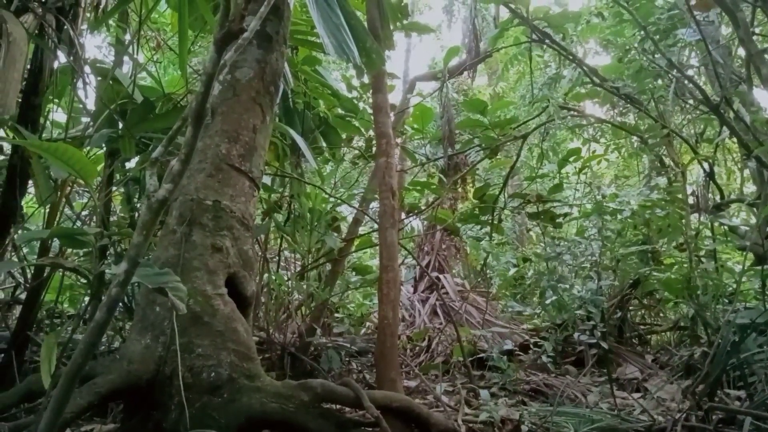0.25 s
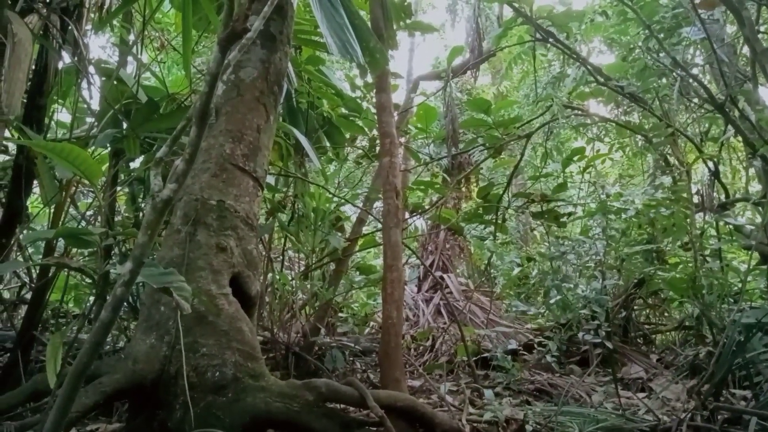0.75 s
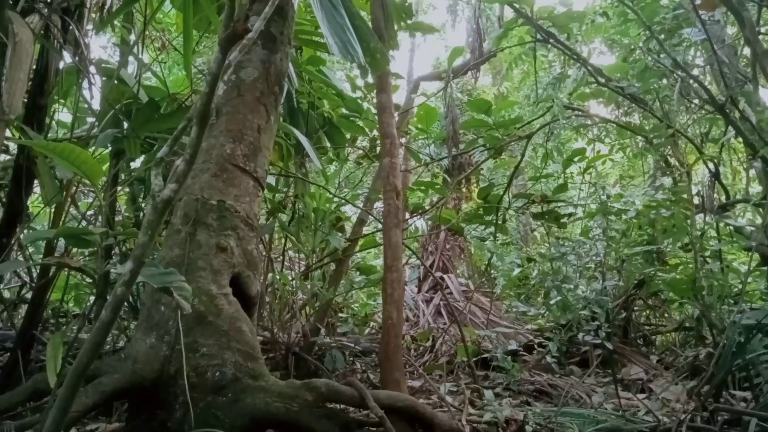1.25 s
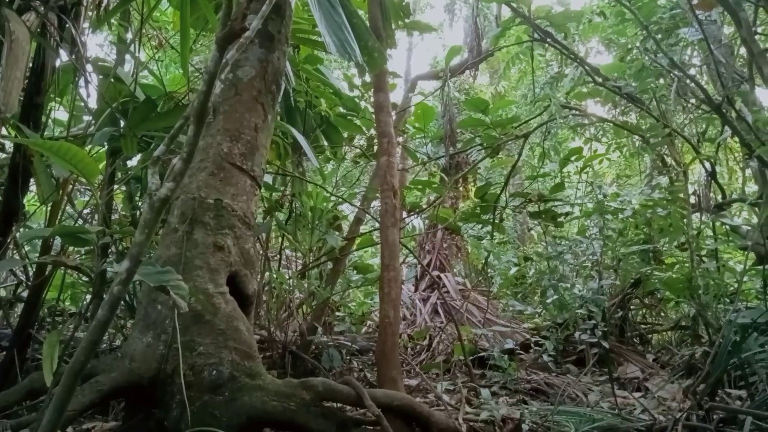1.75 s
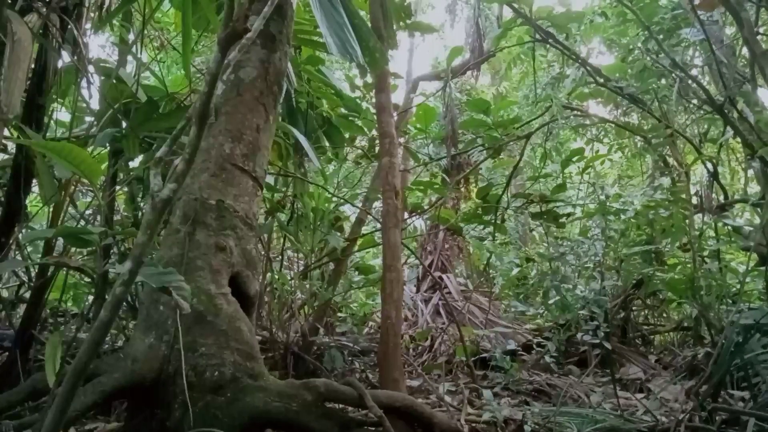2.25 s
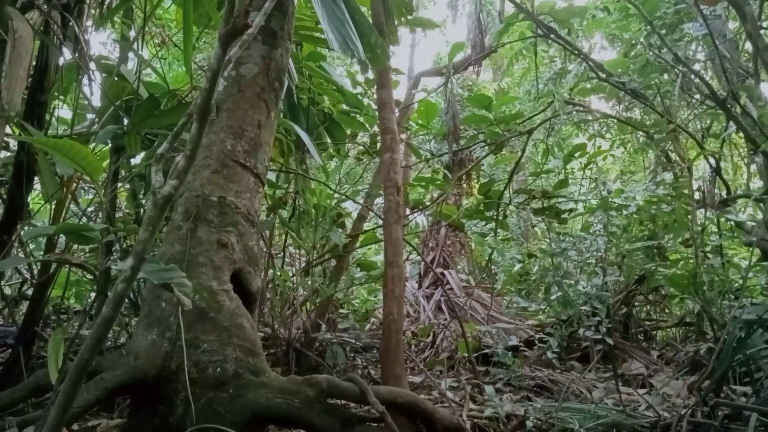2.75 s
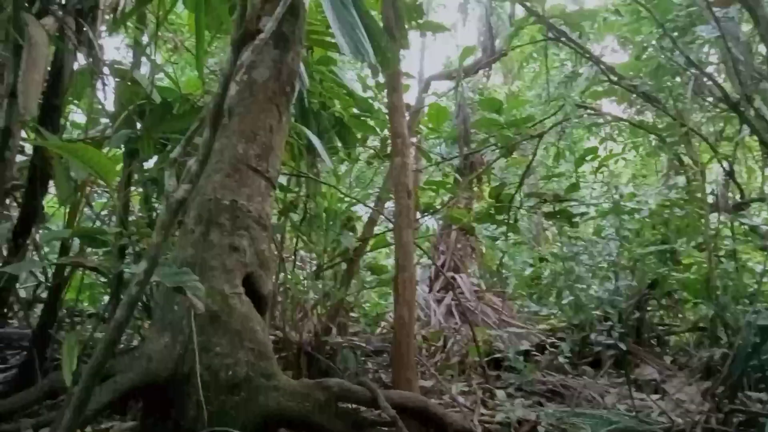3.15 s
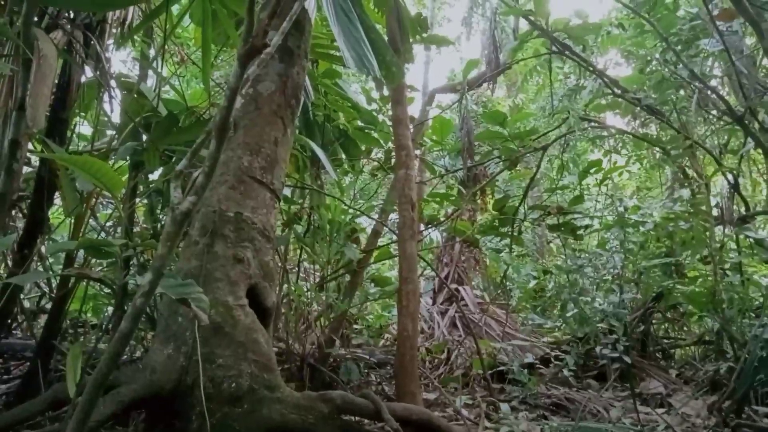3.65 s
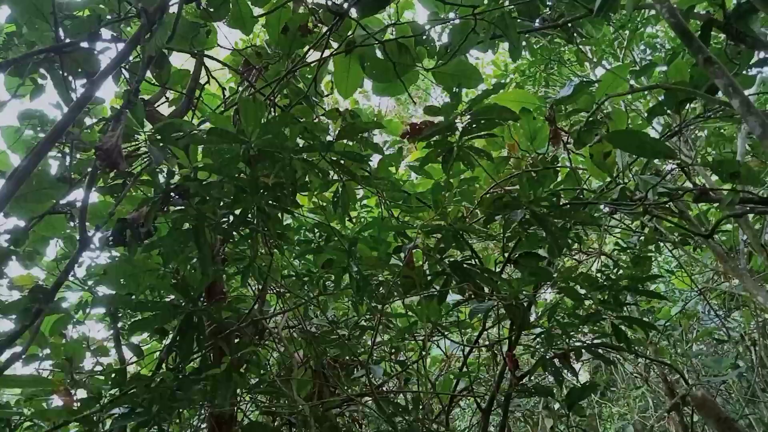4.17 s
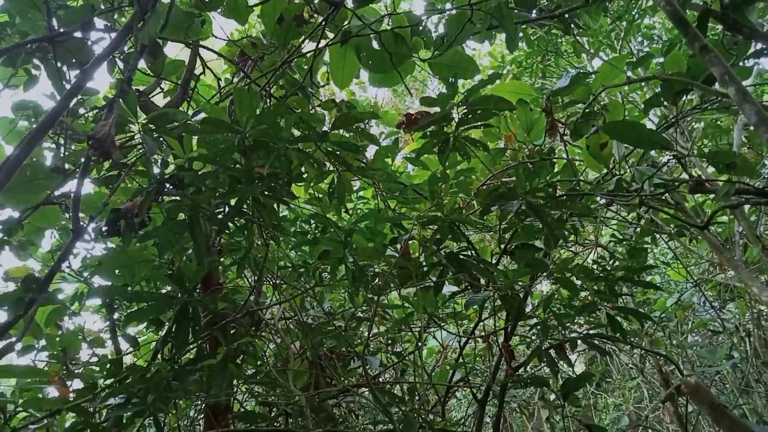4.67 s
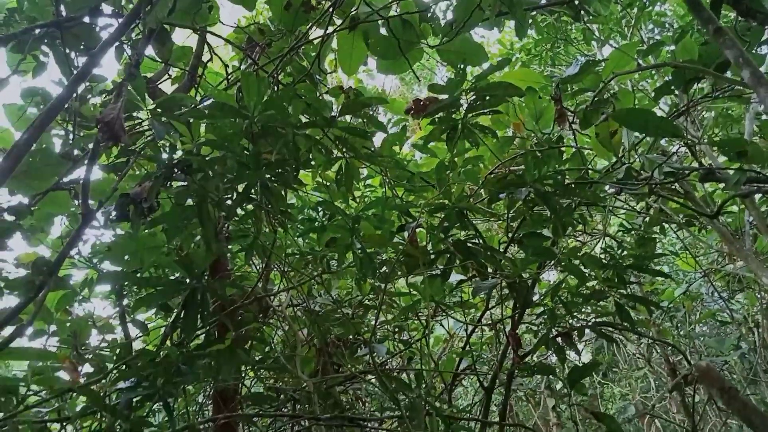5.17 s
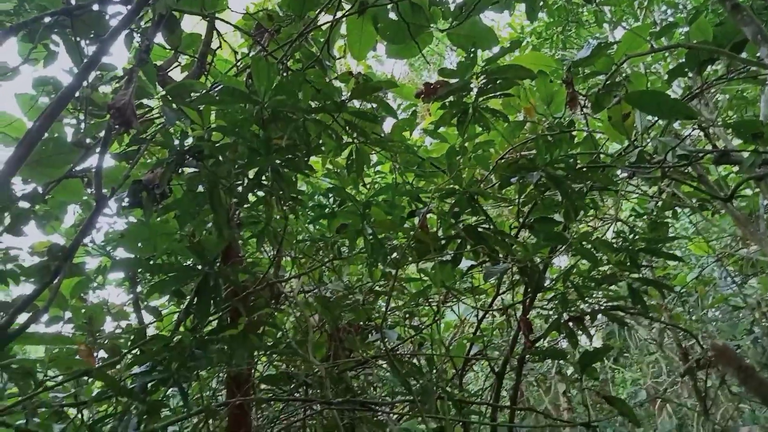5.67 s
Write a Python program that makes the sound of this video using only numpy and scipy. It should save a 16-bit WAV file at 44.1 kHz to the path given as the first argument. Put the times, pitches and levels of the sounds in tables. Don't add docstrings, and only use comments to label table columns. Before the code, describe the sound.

High steady cicada drone in dense forest; a near bird chips, warbles and trills, a sharp click, then hoarse croaks after a brief dip.

```python
import sys
import numpy as np
from scipy import signal
from scipy.fft import rfft, irfft, next_fast_len
from scipy.io import wavfile
from scipy.ndimage import uniform_filter1d

SR = 44100
rng = np.random.default_rng(int(sys.argv[2]) if len(sys.argv) > 2 else 0)


def transcribe(u):
    v = np.clip(np.atleast_2d(u).T, -1, 1)
    q = np.round(v * 32767).astype(np.int16)
    wavfile.write(sys.argv[1], SR, q)


def ratio_of_db(decibels):
    return 10 ** (np.asarray(decibels, float) / 20)


N = 261059
T = np.arange(N) / SR
FIRST_SHOT_END_S, SECOND_SHOT_START_S = 3.886, 4.085
IN_FIRST_SHOT = T < FIRST_SHOT_END_S


def evened(x):
    return x / np.sqrt(np.mean(x ** 2) + 1e-20)


def read(points, hz):
    f, value = np.transpose(points)
    return np.interp(np.log(hz + 1), np.log(f + 1), value)


def add(mix, s, sound):
    part = mix[round(s * SR):][:len(sound)]
    part += sound[:len(part)]


def colour(x, points):
    size = next_fast_len(N)
    hz = np.fft.rfftfreq(size, 1 / SR)
    inside = (hz > points[0][0]) & (hz < points[-1][0])
    spectrum = rfft(x, size) * ratio_of_db(read(points, hz)) * inside
    return evened(irfft(spectrum, size)[..., :N])


def resonate(x, hz, width_hz):
    turn = np.exp(2j * np.pi * np.cumsum(hz * np.ones(len(x))) / SR)
    r = np.exp(-np.pi * width_hz / SR)
    smooth = signal.lfilter([(1 - r) ** 2], [1, -2 * r, r ** 2], x / turn)
    return 2 * (turn * smooth).real


def wander(per_s):
    knots = rng.standard_normal(2000)
    return evened(np.interp(T * per_s, np.arange(2000), knots))


def clicks(per_s):
    turns = np.cumsum(per_s) / SR + rng.random()
    return np.diff(np.floor(turns), prepend=0.).clip(0, 1)


# (frequency [Hz], t60 [s])
FOREST_T60 = [(500, 0.59), (2000, 0.79), (4000, 0.83), (8000, 0.47), (15000, 0.35)]


def forest(x, wide, early_db=0):
    hz, t, z = signal.stft(rng.standard_normal((2, SR)), SR, nperseg=128)
    late = ratio_of_db(-60 * t / read(FOREST_T60, hz)[:, None])
    early = ratio_of_db(early_db + 12.0 - 60 * t / 0.067)
    mid, side = signal.istft(z * (late + early), SR, nperseg=128)[1]
    tails = np.array([mid + wide * side, mid - wide * side]) / np.linalg.norm(mid)
    return signal.fftconvolve(x[None], tails, axes=1)[:, :N]


def sing(hz, gain, shake=0, shake_hz=180, upper_db=-34, rough=0.08, uneven=0.099):
    jitter, flutter = uniform_filter1d(rng.standard_normal((2, len(hz))), size=200) * np.sqrt(200)
    swing = np.sin(2 * np.pi * np.cumsum(shake_hz * (1 + uneven * jitter)) / SR)
    turn = 2 * np.pi * np.cumsum(hz + shake * swing * (1 + .1 * flutter)) / SR
    gain = gain * (1 + rough * flutter)
    upper = ratio_of_db(upper_db) * (ratio_of_db(1.5) * np.sin(2 * turn) + np.sin(3 * turn))
    return np.sqrt(2) * gain * (np.sin(turn) + upper)


def notes(rows, edge, **voice):
    out = np.zeros(N)
    for s, length_s, a_hz, b_hz, c_hz, db in rows:
        u = np.linspace(-1, 1, round(length_s * SR))
        hz = b_hz + (c_hz - a_hz) / 2 * u + ((a_hz + c_hz) / 2 - b_hz) * u ** 2
        gain = ratio_of_db(db) * signal.windows.tukey(len(u), np.clip(edge, 0, 1))
        add(out, s, sing(hz, gain, **voice))
    return out


def follow(rows, **voice):
    s, *columns = np.transpose(rows)
    t = np.arange(s[0], s[-1], 1 / SR)
    hz, db, *shake = (np.interp(t, s, c) for c in columns)
    return s[0], sing(hz, ratio_of_db(db) * signal.windows.tukey(len(t), .08), *shake, **voice)


# (delay [s], length [s], start [Hz], middle [Hz], end [Hz]);
OPENING_SHAPE = [
    (0, .019, 3980, 4150, 5100),
    (.027, .017, 3700, 3600, 2860),
    (.06, .025, 0.363, 4420),
]
# (time [s], first [dB], second [dB], third [dB], third start [Hz])
OPENINGS = [(1.768, -62, -55.5, -51.5, 5430), (1.928, -56, -56, -49, 6100), (2.092, -59, -47, -45, 5980),
            (2.234, -46.5, -43, -41.5, 5970), (2.376, -43.5, -40, -40, 5130)]


def opening_chips():
    up, down, (late_s, length_s, share, end_hz) = OPENING_SHAPE
    rows = []
    for s, up_db, down_db, high_db, hz in OPENINGS:
        middle_hz = end_hz + share * (hz - end_hz)
        rows.append((s + up[0], *up[1:], up_db))
        rows.append((s + down[0], *down[1:], down_db))
        rows.append((s + late_s, length_s, hz, middle_hz, end_hz, high_db))
    return rows


# (delay [s], length [s], start [Hz], middle [Hz], end [Hz], level [dB])
MOTIF_SHAPE = [
    (0, .022, 4120, 3980, 2980, -0.5),
    (.021, 0.012, 3470, 4030, 4330, 1),
    (.041, .023, 3130, 3430, 4090, -1),
]
# (time [s], level [dB], warble length [s], lift of the rise [ratio], warble end [Hz])
MOTIFS = [(2.517, -41, 0.05, 1.01, 2920), (2.679, -37.5, .042, .99, 2760), (2.834, -38, 0.061, 0.93, 2990),
          (3.0, -36, .052, 1.06, 2935), (3.164, -36, .064, 1.026, 2580)]


def motif_chips():
    rows = []
    for s, db, _, lift, _ in MOTIFS:
        for k, (delay_s, length_s, a_hz, b_hz, c_hz, note_db) in enumerate(MOTIF_SHAPE):
            middle_hz = b_hz * lift ** (k == 1)
            end_hz = c_hz * lift ** (k > 0)
            rows.append((s + delay_s, length_s, a_hz, middle_hz, end_hz, db + note_db))
    return rows


def warbles():
    rows = [(s + .058, length_s, 3416, 3020, end_hz, db - 4.5) for s, db, length_s, _, end_hz in MOTIFS]
    return notes(rows, 0.19, shake=316, shake_hz=213.0, rough=0.17)


# (time [s], level [dB])
SQUEAKS = [(3.39, -52.5), (3.489, -53.5)]
# (delay [s], length [s], start [Hz], middle [Hz], end [Hz], level [dB])
SQUEAK_SHAPE = [(0, 0.0088, 3680, 5160, 6500, -2), (.008, .02, 3260, 3750, 3600, 1),
                (0.019, .024, 6300, 6100, 4350, 0.5)]


def squeaks():
    rows = [(s + delay_s, length_s, a_hz, b_hz, c_hz, db + note_db)
            for s, db in SQUEAKS
            for delay_s, length_s, a_hz, b_hz, c_hz, note_db in SQUEAK_SHAPE]
    return notes(rows, 0.45, shake=280, shake_hz=189, rough=0.22, upper_db=-17)


# (time [s], centre [Hz], level [dB])
TRILL = [(3.568, 3450, -34.5), (3.59, 3000, -45.5), (3.615, 2430, -50.5), (3.645, 2870, -49),
         (3.67, 3640, -36), (3.71, 4050, -40.5), (3.8, 4380, -43), (3.883, 4324, -46.5), (3.895, 4200, -62)]


def trill():
    first_hz, last_hz, growth_s = 200, 676, 0.2
    s = np.array(TRILL)[:, 0]
    grown = 1 - np.exp(-(s - s[0]) / growth_s)
    rows = np.column_stack([TRILL, first_hz + (last_hz - first_hz) * grown])
    return follow(rows, rough=0.23, uneven=0.2, upper_db=-32)


def near_bird():
    song = notes(opening_chips() + motif_chips(), 0.51, rough=0.32)
    song += squeaks() + warbles()
    last_note = (3.275, .036, 2620, 2430, 2250, -43)
    song += notes([last_note], 0.54, shake=130, shake_hz=200, rough=0.38)
    add(song, *trill())
    return ratio_of_db(np.array([[-4.2], [-3.1]])) * song + ratio_of_db(-4) * forest(song, 0.35, early_db=7.5)


# (time [s], hold [s], effort [dB], change over hold [dB], throat centre [Hz])
CROAKS = [
    (4.157, 0.074, -54.5, -1, 2026),
    (4.554, 0.16, -40.5, -4, 2170),
    (4.79, .02, -64, -8, 2030),
    (4.878, 0.17, -53.5, -2, 1950),
    (5.013, .15, -41, -2, 2150),
    (5.479, 0.09, -40, -6.5, 2130),
    (5.56, 0.23, -50.5, -7, 2133),
    (5.83, 0.17, -42, -8, 2123),
]
# (share of centre [ratio], width [Hz], level [dB])
THROAT_MODES = [(.86, 228, -4.5), (0.983, 200, 10.5), (1.08, 157.4, 4), (1.21, 300, -9), (1.34, 300, -10),
                (1.58, 250, -21), (.5, 185.2, -15.5)]


def croaker():
    rise_db_per_s, fall_db_per_s = 900, 500
    sag, shut, open_s = -0.056, -0.076, 0.012
    s, hold_s, effort_db, change_db, hz = np.transpose(CROAKS)[:, :, None]
    u = np.clip((T - s) / hold_s, 0, 1)
    db = effort_db + change_db * u
    db = db - rise_db_per_s * (s - T).clip(0) - fall_db_per_s * (T - s - hold_s).clip(0)
    centres_hz = hz * (1 + sag * (u - .5) + shut * np.exp(-u * hold_s / open_s))
    centre_hz = np.take_along_axis(centres_hz, db.argmax(0)[None], 0)[0]
    centre_hz = uniform_filter1d(centre_hz, size=500)
    pulses = clicks(200 * (1 + .035 * wander(40))) * ratio_of_db(1.76 * wander(60))
    drive = evened(pulses) + 0.99 * rng.standard_normal(N)
    modes = [ratio_of_db(g) * resonate(drive, k * centre_hz, width_hz) for k, width_hz, g in THROAT_MODES]
    throat = sum(modes[::2]) - sum(modes[1::2])
    envelope = np.sqrt(uniform_filter1d(throat ** 2, size=2000) + 1e-20)
    voice = throat / envelope * ratio_of_db(db.max(0))
    return ratio_of_db(np.array([[-2.2], [-3.1]])) * voice + ratio_of_db(-5.5) * forest(voice, 0.067, early_db=3.0)


# (time [s], pitch [Hz], level [dB])
WHISTLES = [
    [(1.28, 1801, -64), (1.332, 1698, -62), (1.352, 1904, -58.5), (1.466, 2024, -56), (1.544, 2059, -53), (1.59, 2094, -62), (1.65, 2040, -64), (1.668, 2226, -57), (1.685, 2151, -51)],
    [(2.02, 3020, -59), (2.045, 2950, -48), (2.168, 2869, -54), (2.254, 2540, -47.5), (2.306, 2443, -54), (2.36, 2400, -74)],
    [(3.98, 6050, -79), (4.006, 6083, -74), (4.08, 6050, -92)],
    [(5.38, 1930, -73), (5.41, 1887, -55.5), (5.47, 1842, -49.5)],
    [(5.335, 2475, -78), (5.372, 2646, -60), (5.428, 2820, -69), (5.49, 2930, -67)],
    [(5.5, 3440, -72), (5.54, 3370, -64), (5.736, 3307, -63), (5.77, 3180, -80)],
]
# (time [s], length [s], start [Hz], end [Hz], level [dB])
FLUTTERS = [(1.679, .095, 1905, 1740, -57.5), (2.199, .1, 2550, 2460, -56), (.7, 0.114, 4400, 4450, -76),
            (5.66, .06, 2300, 1450, -55)]
# (time [s], length [s], start [Hz], end [Hz], level [dB])
SLIDES = [(1.222, 0.0777, 1960, 1760, -62.5), (2.13, 0.036, 6300, 5700, -71), (.635, .07, 4720, 4250, -75),
          (5.29, 0.05, 2950, 3640, -69), (5.385, .027, 6400, 6000, -65), (5.405, 0.025, 6150, 3780, -63.5),
          (5.703, 0.045, 6320, 5740, -58), (5.737, 0.015, 5750, 4080, -56.5),
          (5.753, .034, 4210, 3670, -60), (5.825, 0.018, 4800, 4500, -64), (5.87, .05, 3950, 3900, -72)]


def far_birds():
    slides, flutters = ([(s, length_s, a_hz, (a_hz + c_hz) / 2, c_hz, db)
                         for s, length_s, a_hz, c_hz, db in rows] for rows in (SLIDES, FLUTTERS))
    song = notes(slides, 0.14, upper_db=-60)
    song += notes(flutters, 0.22, shake=214, shake_hz=47.7, upper_db=-60)
    peeps = [(.755 + k * .0757, .024, 5600, 5150, 4800, -69.5) for k in range(12)]
    song += notes(peeps, 0.68, rough=0.51, upper_db=-63)
    for rows in WHISTLES:
        add(song, *follow(rows, upper_db=-60, rough=.12))
    return ratio_of_db(np.array([[-1.2], [-2.2]])) * song + ratio_of_db(-5.5) * forest(song, 0.82, early_db=-9.5)


# (time [s], peak [dB], top [Hz], low cut [Hz], sway [dB])
KNOCKS = [
    (3.7497, -10, 1550, 92, -10.5),
    (3.8774, -33.5, 1140, 92.59, -1),
    (4.702, -36.5, 2320, 570, -20),
]


def mic_knocks():
    out, t = np.zeros(N), T[:4000]
    for s, db, top_hz, cut_hz, sway_db in KNOCKS:
        blow = np.exp(-t / 0.00039) + 0.13 * np.exp(-((t - .0011) / 0.00016) ** 2)
        push = signal.sosfilt(signal.butter(5, top_hz * 1.37, fs=SR, output="sos"), blow)
        ring = signal.sosfilt(signal.butter(4, cut_hz, "high", fs=SR, output="sos"), push)
        sway = np.sin(2 * np.pi * (90 * t + 0.21 * (1 - np.exp(-t / 0.0035))))
        sway *= 1 - np.exp(-t / 0.0022)
        add(out, s, ratio_of_db(db) * (ring / ring.max() - ratio_of_db(sway_db - 60 * t / 0.059) * sway))
    return out


# (time [s], peak [dB], pitch [Hz], t60 [s])
TICKS = [(0.076, -40.5, 3250, 0.0094), (.077, -38.5, 2040, 0.0093), (.077, -42, 650, 0.012),
         (0.468, -42, 2850, 0.0063), (.469, -48, 11800, 0.0037), (.469, -60, 5000, .006),
         (0.528, -38, 2780, 0.0065), (.529, -49, 11900, .004), (.529, -58, 5000, .006),
         (.65, -49.5, 1490, .015), (4.794, -40, 1720, 0.028)]


def ticks():
    out, t = np.zeros(N), T[:4000]
    for s, db, hz, t60_s in TICKS:
        add(out, s, ratio_of_db(db - 60 * t / t60_s) * np.sin(2 * np.pi * hz * t))
    return out


# (time [s], level [dB], half length [s], centre [Hz], width [Hz])
RASPS = [
    (5.40, -61.5, 0.085, 13900, 1400),
    (4.30, -72, .03, 13700, 1500),
]


def katydids():
    out = np.zeros(N)
    for s, db, half_s, hz, width_hz in RASPS:
        buzz = evened(resonate(rng.standard_normal(N), hz, width_hz))
        out += ratio_of_db(db) * buzz * np.exp(-abs(T - s) / half_s)
    return out


def chorus(rates_hz, points, crowd, throb_db, throb_hz):
    near = sum(clicks(r * (1 + .006 * wander(7))) * ratio_of_db(1.76 * wander(3.94)) for r in rates_hz)
    drive = evened(forest(near - near.mean(), 0)[0]) + crowd * rng.standard_normal(N)
    beat = np.sin(2 * np.pi * np.cumsum(throb_hz * (1 + 0.0329 * wander(3.8))) / SR)
    return colour(drive, points) * ratio_of_db(throb_db * beat + 0.21 * wander(14))


# (frequency [Hz], level [dB])
LOW_CICADA = [(6000, -41), (6300, -34), (6600, -21.5), (6870, -9.5), (7150, -4), (7350, -2), (7680, -3.5),
              (7850, -10.5), (8050, -23.5), (8300, -13)]
HIGH_CICADA = [(8200, -14), (8450, -2.5), (8650, 3), (8820, 10), (9000, 1.5), (9150, -11), (9380, -17.5),
               (10300, -25), (10900, -25), (13000, -46)]
OVERTONE = [(12300, -26), (13000, -15), (13600, -12), (14400, 2), (15000, -4), (15400, -3), (15540, -9)]
SOLO_CICADA = [(9020, -16), (9110, -3), (9170, 0), (9230, -4), (9310, -18)]
# (start [s], end [s])
BOUTS = [(.07, 0.33), (.33, 1.33), (2.12, 2.8), (2.99, 3.36), (3.72, 3.886), (4.16, 5.92)]


def cicadas(low, high):
    drone = evened(chorus((160, 236, 347), LOW_CICADA, 1.0, 0.19, 47))
    overtone_gain = ratio_of_db(np.where(IN_FIRST_SHOT, -25, -18.5))
    drone = drone + overtone_gain * chorus((320, 410), OVERTONE, 3.6, .6, 17)
    treble = evened(chorus((174, 250), HIGH_CICADA, 1.0, 1.0, 52.5))
    bouts = uniform_filter1d(sum(1. * (T > a) * (T < b) for a, b in BOUTS), size=1200)
    treble = treble + ratio_of_db(-5.5) * bouts * chorus((210,), SOLO_CICADA, 0.95, .8, 50)
    return low * drone + high * treble


# (frequency [Hz], side over mid [dB])
WIDTH = [(60, -6), (110, -17.5), (200, -8.5), (380, -9.5), (700, -16.5), (1290, -9), (2380, -17),
         (4400, -7.5), (8120, -20), (15000, -27)]


def air(points, patchy_db):
    frames, hz = N // 256 + 5, np.fft.rfftfreq(1024, 1 / SR)
    a, b, c, d, patches = rng.standard_normal((frames, 513, 5)).T
    patches = evened(uniform_filter1d(uniform_filter1d(patches, 10, 0), 12, 1))
    mid = a + 1j * b
    side = (c + 1j * d) * ratio_of_db(read(WIDTH, hz))[:, None]
    z = np.array([mid + side, mid - side]) * ratio_of_db(patchy_db * patches)
    return colour(signal.istft(z, nperseg=1024, noverlap=768)[1][:, :N], points)


# (frequency [Hz], level [dB])
WASH_FIRST = [(210, -40), (350, -16), (498, -1), (659, -5.5), (1290, -6), (2070, -5.5), (2250, -3),
              (5080, -16.5), (6020, -18), (6400, -28), (8320, -16), (14100, -120)]
WASH_SECOND = [(210, -41), (350, -10), (415, -1.5), (605, -8.5), (1380, -9.5), (2170, -3), (3320, -12),
               (3940, -19), (6400, -39), (8320, -62), (14100, -120)]


def leaf_wash():
    return np.where(IN_FIRST_SHOT, ratio_of_db(5.0) * air(WASH_FIRST, 2.02), ratio_of_db(6.0) * air(WASH_SECOND, 0.87))


# (frequency [Hz], level [dB])
RUMBLE = [(12, -49), (20, -42), (32, -16), (75, 0.5), (129, 2.5), (450, -17), (580, -60), (990, -120)]
BED = [(20, -24), (40, -10), (100, 0), (370, -6), (480, -17), (1500, -19), (3000, -22), (5500, -31),
       (7000, -34), (10000, -36), (15560, -36)]
# (low cicadas [dB], high cicadas [dB], leaf wash [dB], rumble [dB])
SHOT_DB = [
    (-47, -57.5, -67.5, -61.5),
    (-52, -58.5, -66, -62),
]
# (time [s], level [dB])
AMBIENCE_LEVEL = [(0, 1), (.2, -2), (.5, -1), (1.1, 0), (1.5, 0), (2.4, .7), (3.7, 0.56), (4.09, -32), (4.12, -10.5),
                  (4.2, 4), (4.33, -1.5), (4.45, -0.4), (4.9, 0.1), (5.1, 1.7), (5.35, -1.5), (5.5, 0.5), (5.7, 0),
                  (5.92, -0.3)]


def ambience():
    held_s = np.where(IN_FIRST_SHOT, np.minimum(T, 3.7), T)
    level_db = np.interp(held_s, *np.transpose(AMBIENCE_LEVEL))
    shares = (1.16, 0.98, 0.73, 0.44)
    low, high, wash, rumble = (ratio_of_db(np.where(IN_FIRST_SHOT, a, b) + k * level_db)
                               for a, b, k in zip(*SHOT_DB, shares))
    layers = cicadas(low, high) + wash * leaf_wash() + ratio_of_db(1.0) * rumble * air(RUMBLE, 1.07)
    on = uniform_filter1d(1. * (IN_FIRST_SHOT | (T > SECOND_SHOT_START_S)), size=60)
    return on * layers + ratio_of_db(-62) * air(BED, 1.6)


def scene():
    small_hits = mic_knocks() + ticks() + katydids()
    return near_bird() + croaker() + far_birds() + small_hits + ambience()


def top_cut(x):
    return signal.sosfilt(signal.butter(12, 16580, fs=SR, output="sos"), x)


def record(dry):
    edge = signal.firwin(801, 15520, window=("kaiser", 9), fs=SR)
    mix = signal.oaconvolve(dry, edge[None], "same")
    return top_cut(mix)


dry = scene()
out = record(dry)
transcribe(out)
```